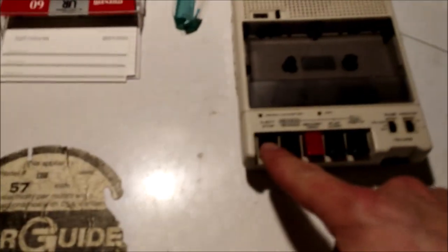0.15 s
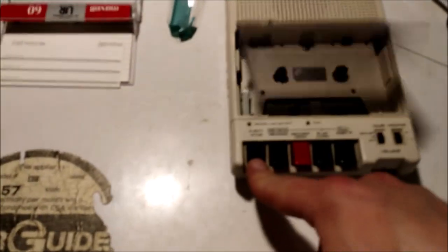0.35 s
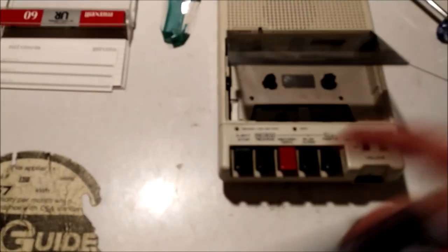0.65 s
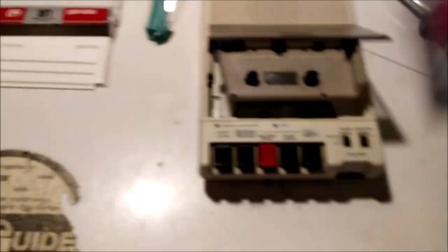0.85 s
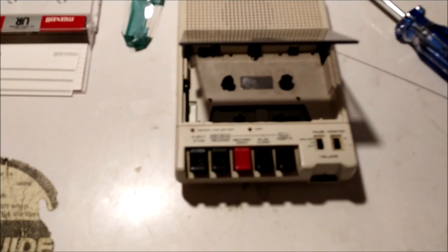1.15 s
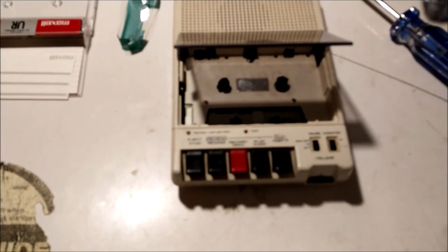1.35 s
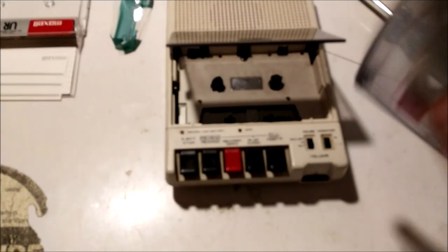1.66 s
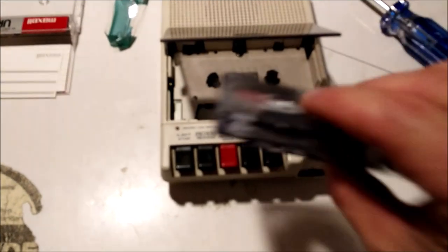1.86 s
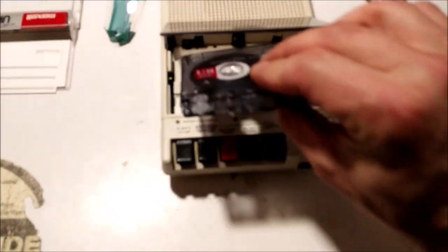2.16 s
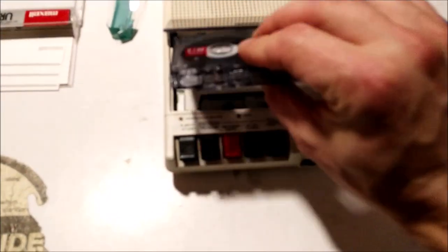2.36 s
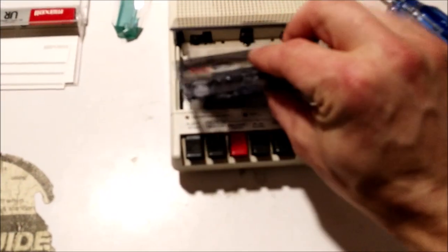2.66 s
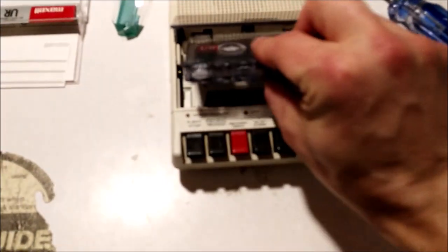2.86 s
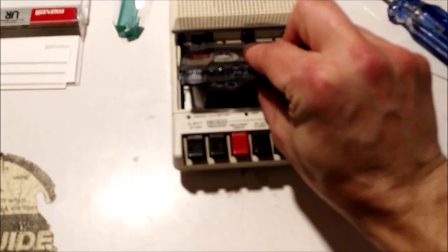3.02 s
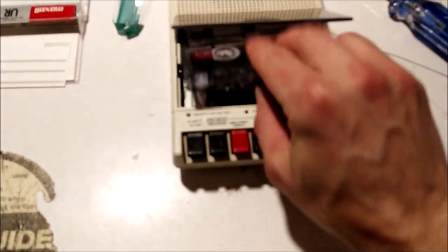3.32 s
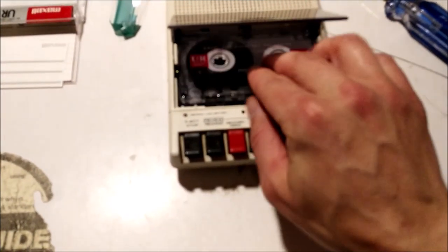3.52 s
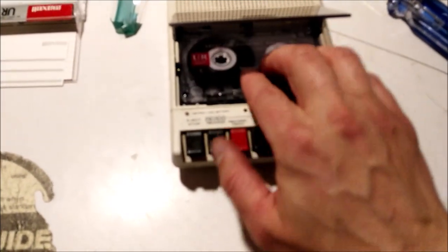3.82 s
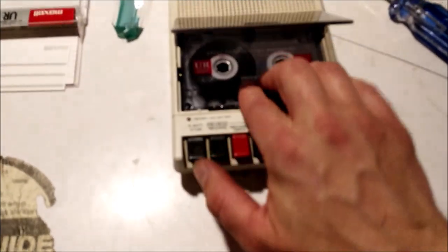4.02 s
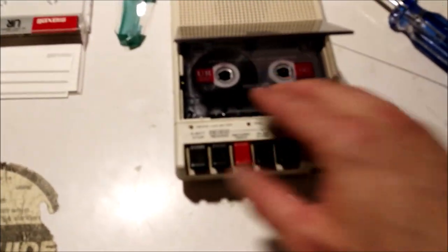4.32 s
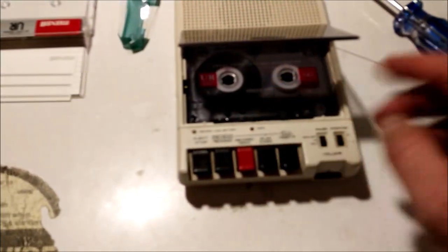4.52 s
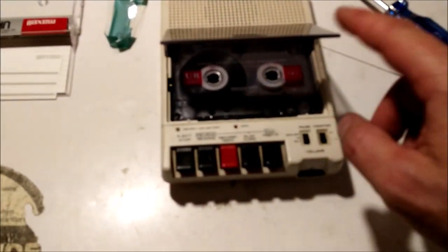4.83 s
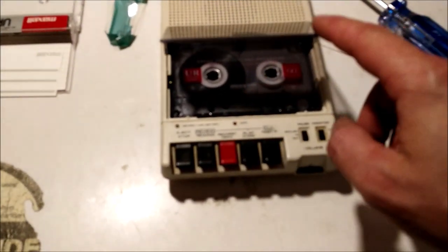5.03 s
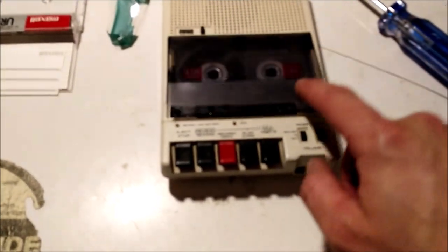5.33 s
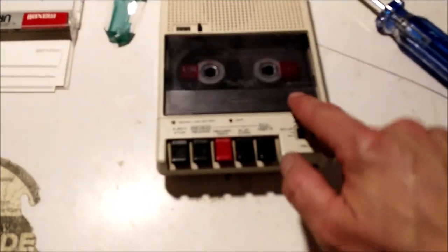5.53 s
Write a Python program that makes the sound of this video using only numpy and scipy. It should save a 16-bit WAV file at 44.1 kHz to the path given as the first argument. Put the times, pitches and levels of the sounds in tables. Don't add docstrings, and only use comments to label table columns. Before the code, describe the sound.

Close, dry handling of thin hollow plastic: a key click, a bouncing lid, then bright rattles from a cassette picked up and turned over, with one puff-like microphone pop between. Irregular clicks and short scrapes follow as it is fitted, two firm clacks seat it, and after a pause the lid shuts with the hardest snap. Soft room noise, little echo.

```python
import sys
import numpy as np
from scipy import signal
from scipy.fft import rfft, irfft, next_fast_len
from scipy.io import wavfile
from scipy.ndimage import uniform_filter1d

SR = 44100
rng = np.random.default_rng(int(sys.argv[2]) if len(sys.argv) > 2 else 0)


def undo_db(level):
    steps = np.asarray(level, float) / 20
    return 10 ** steps


def unload_audio(sound):
    columns = np.transpose(np.atleast_2d(sound))
    steps = np.round(np.clip(columns, -1, 1) * 32767)
    wavfile.write(sys.argv[1], SR, steps.astype(np.int16))


N = 250488


def colour(x, points):
    hz, db = np.transpose(points)
    size = next_fast_len(len(x))
    log_hz = np.log(np.arange(size // 2 + 1) * SR / size + 1)
    gain = undo_db(np.interp(log_hz, np.log(hz), db, left=-90, right=-90))
    return irfft(rfft(x, size) * gain, size)[:len(x)]


def unit(x):
    return x / np.sqrt(np.mean(x ** 2))


def highpass(x, order, hz):
    return signal.sosfilt(signal.butter(order, hz, "high", fs=SR, output="sos"), x)


def add(out, sound, s, db, smooth_ms):
    peak = np.sqrt(2 * uniform_filter1d(sound ** 2, int(smooth_ms * SR / 1000)).max())
    i = int(s * SR)
    fade = np.minimum(np.arange(len(sound))[::-1] / 600, 1) ** 2
    out[i:i + len(sound)] += (sound * fade * undo_db(db) / peak)[:N - i]


def ring(modes, t, scatter_db, detune):
    hz, db, t60 = np.transpose(modes)[:, :, None]
    chance = rng.standard_normal((3, len(modes), 1))
    tones = np.sin(2 * np.pi * hz * (1 + detune * chance[0]) * t) * np.sign(chance[1])
    decay = np.exp(-np.log(1000) * t / np.maximum(t60, 0.004))
    return (undo_db(db + scatter_db * chance[2]) * tones * decay).sum(axis=0)


def crowd(shell, t, t60, count):
    hz, db = np.transpose(shell)
    places = hz[0] * (hz[-1] / hz[0]) ** ((np.arange(count) + rng.random(count)) / count)
    levels = np.interp(np.log(places), np.log(hz), db)
    modes = np.transpose([places, levels, t60 * (1500 / places) ** 0.13])
    return ring(modes, t, scatter_db=1.5, detune=0)


def favour(modes, hz, hold):
    below_db_per_oct, above_db_per_oct = 4.5, 0.5
    modes = np.array(modes, float)
    octaves = np.log2(modes[:, 0] / hz)
    slope = np.where(octaves < 0, -below_db_per_oct, above_db_per_oct)
    modes[:, 1] -= slope * octaves / (0.5 + hold)
    return modes


def chatter(t, ms, spiky):
    grains = rng.standard_normal(len(t)) * undo_db(spiky * np.minimum(rng.exponential(size=len(t)), 2))
    return grains * np.exp(-t / (max(ms, 0.3) / 1000)) * np.minimum(t / 0.00031, 1)


# f/Hz, level/dB
TICK_COLOUR = [(2800, -6), (4200, 1), (6000, -3), (8000, -7.5), (9500, -40)]
# f/Hz, level/dB
SNAP_COLOUR = [(7000, -20.5), (9000, -2.5), (11500, -1), (13800, 0), (15000, -26)]
# f/Hz, level/dB
CRACK_COLOUR = [(500, -23), (2600, 7.5), (3600, -0.5), (6000, -30)]


def contacts(hits, outline, lasting, t60, lead_t60, snap_db):
    lead_over_crowd_db, softer_db_per_ms = 4.5, 1
    lasting_db, dry_db, crack_db = -3.5, -1.5, -20
    load_s = 0.00037
    out, t = np.zeros(N), np.arange(3072) / SR
    for s, shell_db, tick_db, hz, ms in hits:
        force = chatter(t, 1.32 * ms, spiky=1.2)
        force[int(0.0004 * SR)] = 1.5 * np.abs(force).max()

        hold = min(ms / 4, 1) ** 0.5
        shell = favour(outline, hz, hold)
        modes = unit(crowd(shell, t, t60 * hold, count=30))
        long_modes = favour(lasting, hz, hold) * [1, 1, hold]
        modes = modes + undo_db(lasting_db) * hold * unit(ring(long_modes, t, scatter_db=2, detune=0.006))

        body = unit(signal.fftconvolve(force, modes)[:len(t)]) + undo_db(dry_db) * unit(colour(force, shell))
        lead = ring([(hz, 0, lead_t60 * ms / 4)], t, scatter_db=0, detune=0)
        body = body + undo_db(lead_over_crowd_db - softer_db_per_ms * ms) * unit(lead)
        body = body + undo_db(crack_db) * unit(colour(force, CRACK_COLOUR))
        body = body * (1 - np.exp(-t / load_s))
        add(out, body, s, shell_db, smooth_ms=2)

        tail = rng.standard_normal(len(t)) * np.exp(-t / 0.0082)
        treble = force / np.abs(force).max() + undo_db(-20) * tail
        treble *= np.minimum(t / (0.0004 * ms + 0.0003), 1)
        add(out, colour(treble, TICK_COLOUR), s, tick_db, smooth_ms=2)
        snap = colour(treble * np.sign(rng.standard_normal(len(t))), SNAP_COLOUR)
        snap_level_db = tick_db + snap_db + 0.22 * (tick_db + 30)
        add(out, snap, s, snap_level_db, smooth_ms=2)
    return out


# t/s, shell level/dB, treble level/dB, loudest f/Hz, chatter/ms
EJECT_HITS = [(.253, -21.5, -44, 2560, 1.7), (.2545, -31, -49, 1477, 4.4), (.256, -32.5, -58, 906, 3.5),
              (.281, -48, -72, 1530, 4), (.3007, -47.5, -68, 2540, 9.5), (.4215, -33, -47, 1250, 2.4),
              (.4378, -53, -67, 1400, 6.2), (.456, -37, -62, 1520, 4), (.4615, -41, -38.5, 1440, 4.2),
              (.469, -33, -42, 1530, 8.5), (.4885, -38, -49, 2020, 3.9), (.4937, -26.5, -33.5, 1630, 3),
              (.4995, -25.5, -47, 1950, 1.5), (.5215, -21, -32.5, 2180, 5.3),
              (.5334, -25.5, -34.5, 894, 5.2), (.549, -29, -41.5, 1463, 5.2), (.578, -40, -63, 2540, 10),
              (.6115, -29.5, -59, 1760, 1.9), (.6465, -22, -31.5, 1650, 1.2),
              (.6558, -20.5, -33.5, 2170, 3.9), (.666, -23, -44, 1293, 3.9), (.6825, -27.5, -58, 1370, 29),
              (.6979, -32, -28.5, 1680, 3.6), (.7092, -23, -24.5, 1990, 3.6), (.7155, -22, -41, 2100, 2.7),
              (.7471, -30, -45, 2380, 6), (.7749, -19.5, -36, 2206, 2.6), (.7894, -26, -37, 1455, 4)]
INSERT_HITS = [(2.4461, -30.5, -43.5, 1530, 2.2), (2.456, -31.5, -53, 1580, 3.4),
               (2.4868, -24.5, -48.5, 1640, 3), (2.505, -43, -67, 1440, 2.5),
               (2.5196, -24.5, -46, 1580, 1.7), (2.5278, -28, -48, 1580, 2.6),
               (2.5894, -43.5, -46.5, 1415, 12.6), (2.7021, -26, -43.5, 1354, 4.5),
               (2.7192, -33, -49, 1245, 5.8), (2.7383, -25, -45, 1576, 4.4),
               (2.8182, -35.5, -58, 1830, 4.3), (2.8322, -23.5, -38.5, 1359, 6.6),
               (2.852, -28, -59, 2150, 1.8), (2.9127, -20, -45, 1787, 3.15),
               (3.0157, -29, -54.5, 1580, 4.1), (3.0775, -24.5, -51.5, 2120, 2.2),
               (3.0795, -23, -34.5, 1315, 5), (3.1347, -14.5, -26.5, 1990, 5.8),
               (3.1375, -13.5, -27.5, 1344, 5.2), (3.141, -22, -37, 2700, 1.7),
               (3.146, -25, -34.5, 1010, 3.6), (3.153, -21.5, -42.5, 1660, 5),
               (3.1648, -27.5, -38.5, 1830, 2.6), (3.176, -30, -48, 1247, 12),
               (3.1888, -20.5, -37, 1920, 1.2), (3.2061, -28.5, -42, 2400, 9),
               (3.2899, -20, -38.5, 1413, 2.4), (3.3003, -24.5, -42.5, 2910, 3.9),
               (3.3171, -31.5, -42.5, 1330, 5.7), (3.328, -35.5, -49.5, 1990, 2.6)]
PRESS_HITS = [(3.4379, -41, -60.5, 1030, 29), (3.4757, -27.5, -46, 1450, 2.3), (3.529, -46, -53.5, 3260, 8),
              (3.544, -38, -58.5, 2230, 23), (3.57, -25, -29.5, 2740, 9.3), (3.574, -25.5, -30, 1430, 2.1),
              (3.5812, -18, -32, 2200, 2.7), (3.5885, -17, -30, 2220, 2.5), (3.592, -20, -36.5, 1510, 13),
              (3.6018, -11.5, -23, 2090, 1.9), (3.6043, -12.5, -23.5, 1900, 2.5),
              (3.6108, -21.5, -29.5, 1605, 4), (3.619, -27, -39, 1800, 2), (3.629, -22, -33.5, 2750, 1.7),
              (3.6468, -23, -42, 1880, 3.1), (4.049, -49.5, -64, 1500, 1.8), (4.054, -42, -62.5, 1600, 2.2),
              (4.058, -29, -45, 1510, 4.5), (4.0657, -16.5, -29.5, 2394, 1.6), (4.07, -31, -43, 1990, 2.4),
              (4.0802, -13, -22.5, 1844, 2), (4.0853, -16, -32, 1990, 3.7),
              (4.092, -25.5, -45.5, 1850, 2.4), (4.105, -23, -38.5, 1970, 1.16),
              (4.2457, -60.5, -59, 2940, 4.8), (4.372, -45, -53.5, 1836, 2), (4.4539, -45, -58, 1710, 2.1)]
LID_HITS = [
    (5.5407, -37.5, -36, 1470, 3.2),
    (5.545, -36, -48, 2180, 1.5),
    (5.549, -37, -60, 1390, 5),
    (5.579, -44, -67, 1190, 4.7),
    (5.592, -34, -49, 1530, 5.1),
    (5.5968, -7.5, -20, 1620, 2.5),
    (5.6007, -8.5, -15.5, 1430, 1.1),
    (5.6035, -13.5, -37, 1010, 2.2),
    (5.61, -19, -39, 1310, 3.4),
    (5.616, -24.5, -41, 810, 3.3),
]
# f/Hz, level/dB
DECK_OUTLINE = [(550, -13), (750, -7), (1100, -5), (1350, -1), (2050, -2), (2700, -4.5), (3500, -16.5),
                (4300, -44.5)]
# f/Hz, level/dB, t60/s
CASE_MODES = [(657, -5, .07), (783, -11.5, 0.046), (968, -2.5, 0.029), (1353, -1.5, 0.13),
              (1620, -4.5, .07), (1830, -8, .06), (2093, 5.5, .07), (2680, -3.5, .05)]


def recorder():
    well = contacts(INSERT_HITS + PRESS_HITS, DECK_OUTLINE, CASE_MODES, t60=0.042, lead_t60=0.043, snap_db=-2.5)
    lid = contacts(EJECT_HITS + LID_HITS, DECK_OUTLINE, CASE_MODES, t60=0.032, lead_t60=0.037, snap_db=-8.5)
    return highpass(well + lid, 2, 400)


# t/s, shell level/dB, treble level/dB, loudest f/Hz, chatter/ms loose cassette
RATTLE_HITS = [(.8314, -31, -54, 1430, 4.9), (.8554, -32, -73, 1560, 1.8), (.8866, -33, -76, 1440, 9.5),
               (.895, -33, -69, 1850, 4.6), (.9199, -27.5, -63, 1670, 3), (.9285, -9.5, -31.5, 1500, 2.2),
               (.9445, -20.5, -49, 1830, 0.63), (.9866, -26, -37.5, 1770, 3.1),
               (1.019, -23, -38, 1610, 4.6), (1.0249, -11, -53, 1420, 0.68), (1.032, -37, -42, 1730, 2.6),
               (1.05, -38, -60, 1690, 2.7), (1.065, -24.5, -52, 1830, 2.1), (1.0856, -55.5, -48, 2640, 3),
               (1.096, -28, -53, 1790, 1.3), (1.0988, -23, -40.5, 1880, 3.5),
               (1.1321, -36, -42, 2570, 4.4), (1.137, -29, -38, 1890, 8.9),
               (1.1442, -11.5, -28, 2070, 0.83), (1.1509, -24, -31, 1530, 1.3),
               (1.1586, -21, -34, 1870, 3.1), (1.163, -20, -50, 1780, 1.1),
               (1.1652, -16, -29.5, 1620, 0.83), (1.1705, -25, -42, 1780, 5.9),
               (1.18, -20, -47, 1710, 0.83), (1.1838, -19, -37, 1560, 0.91), (1.1905, -26, -56, 1650, 1.6),
               (1.2028, -37, -62, 1860, 2.4), (1.3254, -45, -71, 1840, 1.8),
               (1.5755, -61, -60, 1620, 3.4), (1.5922, -41.5, -52.5, 2700, 3.4),
             (1.6258, -40, -70, 1650, 3.5), (1.674, -42, -56, 1680, 8.7), (1.686, -29, -35.5, 1520, 4.3),
             (1.692, -25.5, -45, 2210, 3.9), (1.6994, -20, -33, 2660, 2.5),
             (1.7092, -16.5, -32.5, 1894, 2.5), (1.714, -19.5, -30, 1800, 2.3),
             (1.7204, -14, -34, 1530, 3.9), (1.727, -19, -37, 1730, 2.8), (1.7346, -22, -36, 1850, 1.7),
             (1.7418, -24.5, -40, 1680, 4.4), (1.749, -27, -44.5, 1830, 3.8), (1.767, -30, -54, 1670, 1.7),
             (1.771, -8.5, -30.5, 1810, 1.36), (1.774, -31, -48, 1900, 2), (1.7775, -28, -43, 1900, 2.1),
             (1.813, -51, -44.5, 1440, 1.7), (1.8315, -29.5, -49, 1310, 5.1), (1.846, -29.5, -55, 1610, 16),
             (1.863, -19.5, -34.5, 1644, 5.9), (1.8724, -14, -31, 1880, 2.5),
             (1.8781, -21.5, -38, 1840, 1.6), (1.884, -19, -48, 1600, 2.3), (1.8938, -32, -47, 1620, 5.2),
             (1.9025, -17, -36.5, 1640, 4.4), (1.91, -27, -43, 1780, 1.6), (1.956, -49, -58, 1700, 2),
             (1.9663, -36, -78, 1580, 8.8), (1.986, -41, -71, 1620, 5), (2.017, -30, -63, 1690, 0.74),
             (2.0292, -20, -40, 1820, 3.3), (2.033, -32, -54, 1700, 2.2), (2.039, -21, -41.5, 1730, 0.63)]
# f/Hz, level/dB
CASSETTE_OUTLINE = [(700, -23), (1050, -22), (1300, 5.5), (1900, 5), (2500, -3.5), (3100, -23.5),
                    (4300, -37.5)]
# f/Hz, level/dB, t60/s
CASSETTE_MODES = [(1292, -3, 0.036), (1530, -7.5, 0.029), (1650, -8, .035), (1880, -5.5, 0.027),
                  (2150, -11, 0.038), (2630, -4, 0.039), (3230, -20, .015)]


def cassette_in_hand():
    hits = RATTLE_HITS
    rattle = contacts(hits, CASSETTE_OUTLINE, CASSETTE_MODES, t60=0.012, lead_t60=0.039, snap_db=-5)
    return highpass(rattle, 3, 880)


# t/s, level/dB, centre f/Hz, chatter/ms
EDGE_SPITS = [(0.252, -52, 12800, 4), (.4612, -46, 13900, 2), (.4907, -33.5, 13500, 6),
              (.5212, -38, 13500, 3), (.533, -31, 11000, 3), (.545, -39, 13000, 12), (.6553, -25, 14000, 4),
              (.666, -31, 13500, 5), (.6977, -27, 14000, 5), (.774, -42, 13700, 2), (.789, -35, 12900, 4),
              (.9865, -44, 12000, 1.5), (1.03, -50, 12500, 8), (1.1442, -27.5, 11100, 2),
              (1.1641, -39, 11000, 6), (1.7214, -34.5, 11700, 1.5), (1.77, -29, 8900, 2),
              (1.8122, -46.5, 11000, 2), (1.907, -39, 13500, 7), (2.5889, -42, 14000, 7),
              (3.0798, -40.5, 12600, 2), (3.5273, -50, 14100, 12), (3.5587, -41, 13000, 20),
              (3.6021, -24.5, 13500, 5), (3.619, -37, 13000, 3), (4.065, -30, 13900, 2.5),
              (4.08, -21, 13300, 5), (4.2451, -59, 13000, 4), (4.3714, -53, 14000, 2),
              (4.4547, -56, 12400, 2), (5.5402, -31, 13400, 3), (5.5771, -39, 13500, 8),
              (5.5957, -12.5, 13400, 3)]


def edges():
    width, skirt_db = 0.15, -10
    out, t = np.zeros(N), np.arange(3072) / SR
    for s, db, hz, ms in EDGE_SPITS:
        peak = [(hz * (1 - 4 * width), 3 * skirt_db), (hz * (1 - width), skirt_db),
                (hz, 0), (hz * (1 + width), skirt_db)]
        add(out, colour(chatter(t, ms, spiky=2.0), peak), s, db, smooth_ms=2)
    return out


# t/s, level/dB, f/Hz, t60/s
SPRING_RINGS = [(2.446, -40, 5900, 0.06), (2.4465, -53, 7950, .04), (2.487, -46.5, 5900, .04),
                (2.52, -44.5, 6400, 0.022), (2.59, -53, 4000, 0.083), (2.5905, -42, 8600, 0.024),
                (3.08, -27.5, 6700, 0.0067), (4.058, -33.5, 4000, .012), (4.081, -22, 2750, .015),
                (5.5414, -26, 1480, 0.028), (5.542, -46, 4800, .03), (5.597, -16, 7400, 0.0077)]


def leaf_spring():
    out, t = np.zeros(N), np.arange(3072) / SR
    for s, db, hz, t60 in SPRING_RINGS:
        pair = [(hz, 0, t60), (hz * 1.012, -6, t60)]
        add(out, ring(pair, t, scatter_db=2, detune=0.003), s, db, smooth_ms=2)
    return out


def effort(start_s, hold_s, db):
    rise_db_per_s, fall_db_per_s = 494.5, 259
    t = np.arange(N) / SR
    gain = np.zeros(N)
    for s, hold, level in zip(start_s, hold_s, db):
        rise = rise_db_per_s * np.maximum(s - t, 0)
        fall = fall_db_per_s * np.maximum(t - s - hold, 0)
        gain += undo_db(level - rise - fall)
    return gain


# start t/s, hold t/s, shell level/dB, hiss level against it/dB
SLIDES = [(0.433, .06, -60, -5), (0.486, 0.037, -49, -10), (0.554, 0.034, -66, -23),
          (0.676, 0.021, -48.5, -0.5), (.75, 0.068, -54, -9), (0.897, 0.046, -55.5, -12),
          (1.135, 0.043, -51.5, -9), (1.572, .06, -61.5, -8), (1.72, .06, -57, -11),
          (1.813, 0.07, -59, -31), (1.966, 0.073, -59.5, -11), (2.5, .05, -73, 0), (2.77, 0.092, -57, -22),
          (3.093, 0.14, -45.5, -14.5), (3.275, 0.02, -53.5, -6), (3.33, 0.2, -64, 0),
          (3.563, 0.038, -50, 4), (4.077, .06, -55, -7), (5.606, .03, -53, 6.5)]
# start t/s, hold t/s, rumble level/dB
LEANS = [
    (0.444, 0.12, -47),
    (0.65, 0.16, -46),
    (0.91, 0.056, -57.5),
    (1.726, 0.14, -59),
    (2.536, 0.23, -59.5),
    (2.755, 0.069, -50.5),
    (3.095, .55, -49),
    (4.062, 0.097, -47),
    (5.594, 0.11, -47),
]


def rubbing():
    t = np.arange(N) / SR
    grip = undo_db(3.0 * unit(uniform_filter1d(rng.standard_normal(N), size=300)))
    grains = grip * rng.standard_normal(N) * undo_db(1.5 * rng.exponential(size=N))
    in_hand = (t > 0.8) & (t < 2.2)
    shell = np.where(in_hand, unit(colour(grains, CASSETTE_OUTLINE)), unit(colour(grains, DECK_OUTLINE)))
    hiss = unit(colour(grains, TICK_COLOUR) + colour(grains, SNAP_COLOUR))
    rumble_colour = [(60, 9), (100, -4.5), (200, -7.0), (400, -11.0), (600, -18.5)]
    rumble = unit(colour(rng.standard_normal(N), rumble_colour))
    s, hold, db, hiss_db = np.transpose(SLIDES)
    scrape = shell * effort(s, hold, db) + hiss * effort(s, hold, db + hiss_db)
    return scrape + rumble * effort(*np.transpose(LEANS))


# t/s, level/dB,
# f/Hz, t60/s, case cavity level/dB
BENCH_BLOWS = [(0.253, -43.5, 244, 0.051, -46), (0.522, -43, 270, 0.034, -61),
               (0.527, -21.5, 104, 0.076, -28.5), (0.559, -32.5, 74, 0.22, -38),
               (0.647, -25.5, 101, 0.12, -49), (0.715, -33, 111, 0.063, -64),
               (0.776, -35.5, 107, 0.13, -44), (.9, -42.5, 131, 0.099, -46), (1.4, -50, 115, 0.1, -69),
               (2.447, -48, 120, 0.032, -51), (2.49, -43.5, 285, 0.099, -60),
               (2.601, -37.5, 110, 0.027, -64), (2.702, -36, 74.5, 0.03, -44),
               (2.74, -37.5, 73, 0.079, -36), (2.836, -46, 226, 0.14, -42), (3.016, -42, 450, 0.026, -54),
               (2.913, -42, 297, 0.052, -38.5), (3.082, -33, 84, 0.026, -48.5),
               (3.135, -27, 286, 0.091, -27.5), (3.289, -27.5, 79, 0.03, -40.5),
               (3.575, -29.5, 135.4, 0.25, -36.5), (3.605, -22.5, 106, 0.05, -30.5),
               (3.671, -40, 75.5, 0.041, -69), (4.0799, -19.5, 271, 0.029, -19.5),
               (4.103, -29, 117, 0.033, -36), (5.54, -40, 408, 0.12, -37.5), (5.597, -29, 403, 0.061, -18),
               (5.599, -21, 118.6, 0.16, -22), (1.902, -60.5, 403, 0.033, -42.5)]
# f/Hz, level/dB, t60/s
CASE_AIR = [(446, -2, 0.087), (670, 1, 0.049), (840, -1.5, 0.082)]


def bench():
    out, t = np.zeros(N), np.arange(8192) / SR
    push = np.hanning(int(0.0007 * SR))
    for s, db, hz, t60, cavity_db in BENCH_BLOWS:
        panel = [(hz, 0, t60), (105, -8, 0.12), (205, -15, 0.08), (270, -14, 0.07), (350, -16, 0.06)]
        swing = ring(panel, t, scatter_db=4.0, detune=0.015) * (1 - np.exp(-t * hz / 0.27))
        add(out, signal.fftconvolve(push, swing)[:len(t)], s, db, smooth_ms=9)
        air = ring(CASE_AIR, t, scatter_db=1.5, detune=0.055)
        cavity = signal.fftconvolve(chatter(t, 0.29, spiky=1.6), air)
        add(out, cavity[:len(t)], s, cavity_db, smooth_ms=4)
    return out


# t/s, level/dB
PRESSURE_STEPS = [
    (1.2816, -11.5),
    (1.3083, -34),
]


def pops():
    steps = np.zeros(N)
    for s, db in PRESSURE_STEPS:
        steps[int(s * SR):] += undo_db(db)
    steps = signal.sosfilt(signal.butter(1, 1800, fs=SR, output="sos"), steps)
    return highpass(steps, 5, 52)


def walls(x):
    t60_s, wet_db = 0.15, -15.5
    t = np.arange(int(0.3 * SR)) / SR
    tail = rng.standard_normal(len(t)) * np.exp(-np.log(1000) * t / t60_s) * np.minimum(t / 0.0062, 1)
    tail = colour(tail, [(100, 11.0), (1500, -1.0), (6000, -2.0), (15000, -2.0)])
    return undo_db(wet_db) * signal.fftconvolve(x, tail / np.sqrt(np.sum(tail ** 2)))[:N]


# f/Hz, level/dB
ROOM_COLOUR = [(15, -55), (25, -20.5), (41, -7), (64, -1.5), (86, -18.5), (239, -20), (313, -23),
               (421, -23.5), (1660, -30), (2060, -32.5), (2230, -32), (2550, -35.5), (8560, -46.5),
               (13900, -41.5), (15500, -59.5)]
# f/Hz, rms level/dB
HUM_LINES = [(59.2, -60), (183.0, -78.5), (236.9, -72), (3600, -87.5), (6810, -89), (9600, -87),
             (10600, -86.5)]


def room_tone():
    t = np.arange(N) / SR
    tone = undo_db(-57) * unit(colour(rng.standard_normal(N), ROOM_COLOUR))
    for hz, db in HUM_LINES:
        waver = np.cumsum(rng.standard_normal(N)) * 0.0068
        tone += undo_db(db) * np.sqrt(2) * np.sin(2 * np.pi * hz * t + waver)
    return tone


def scene():
    near = recorder() + cassette_in_hand() + edges() + leaf_spring() + rubbing()
    air = near + walls(near) + bench() + room_tone()
    return (highpass(air, 4, 40) + pops())[None]


def band_limit(x):
    return signal.sosfilt(signal.butter(12, 15620, fs=SR, output="sos"), x)


def record(dry):
    headroom, top_hz = 1.1, 14350
    rounded = headroom * np.tanh(dry / headroom)
    x = signal.sosfilt(signal.ellip(12, 0.2, 75, top_hz, fs=SR, output="sos"), rounded)
    return band_limit(x)


dry = scene()
out = record(dry)
unload_audio(out)
```